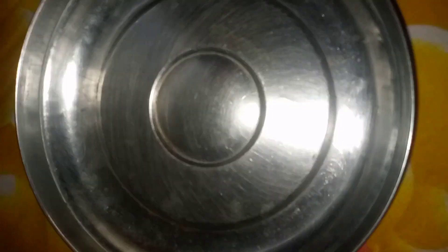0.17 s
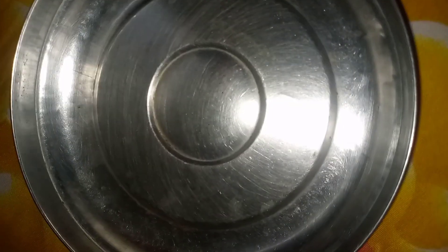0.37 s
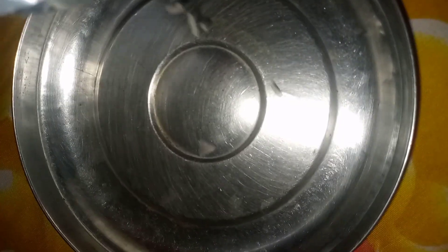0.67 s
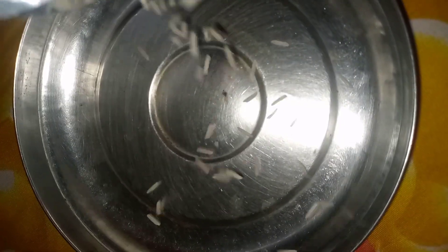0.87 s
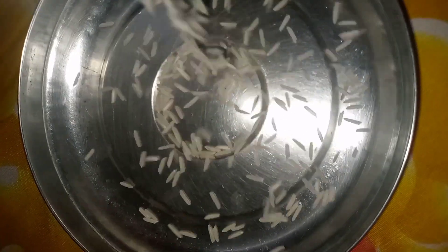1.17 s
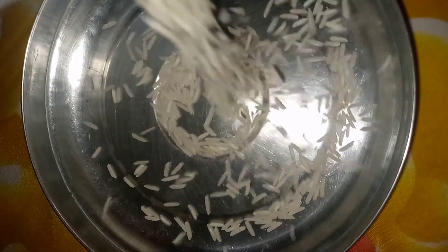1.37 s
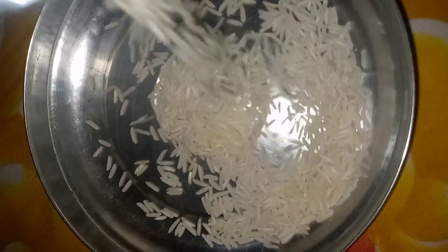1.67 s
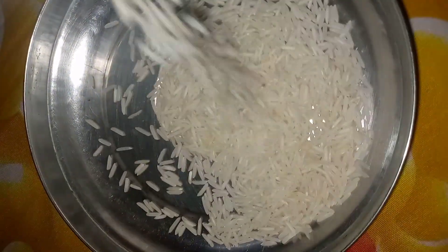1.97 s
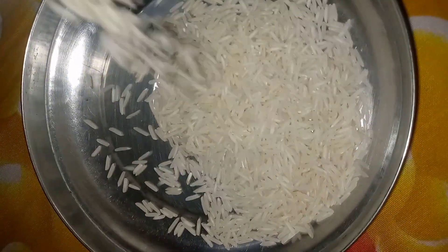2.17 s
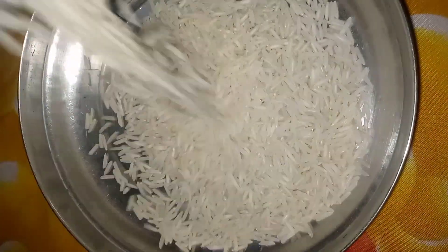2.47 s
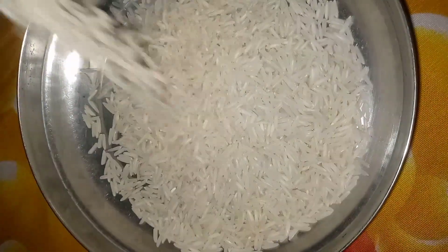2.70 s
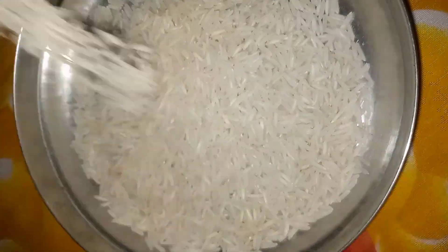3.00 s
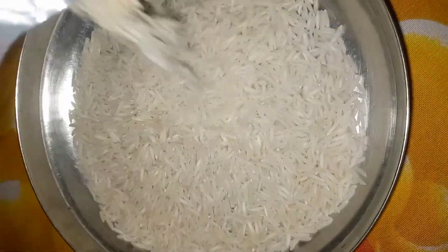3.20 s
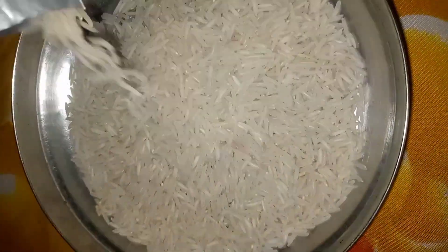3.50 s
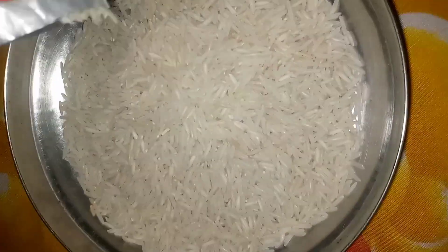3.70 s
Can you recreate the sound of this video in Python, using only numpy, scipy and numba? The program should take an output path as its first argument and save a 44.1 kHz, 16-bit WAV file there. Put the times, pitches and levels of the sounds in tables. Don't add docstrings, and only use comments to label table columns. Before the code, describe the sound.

Dry rice rattles from a scoop into an empty steel bowl, ringing brightly, then growing duller.

```python
import sys
import numpy as np
from scipy import signal
from scipy.fft import rfft, irfft
from scipy.io import wavfile
from scipy.ndimage import uniform_filter1d
from numba import njit

SR = 44100
rng = np.random.default_rng(int(sys.argv[2]) if len(sys.argv) > 2 else 0)


def voltage_ratio(decibels):
    exponent = np.asarray(decibels, float) / 20
    return 10 ** exponent


def generate_wav(signal):
    frames = np.transpose(np.atleast_2d(signal))
    scaled = np.clip(frames, -1, 1) * 32767
    pcm = np.round(scaled).astype(np.int16)
    wavfile.write(sys.argv[1], SR, pcm)


N = 169785
T = np.arange(N) / SR


def unit(x):
    return x / np.sqrt(np.mean(x ** 2))


def cut(x, low_hz):
    return signal.sosfilt(signal.butter(2, low_hz, "high", fs=SR, output="sos"), x)


def colour(x, table):
    spectrum = rfft(x)
    hz, db = np.array(table, float).T
    f = np.arange(len(spectrum)) * SR / N + 1
    flat = np.sqrt(uniform_filter1d(np.abs(spectrum) ** 2, size=3000))
    gain = voltage_ratio(np.interp(np.log(f), np.log(hz), db, right=db[-1]))
    gain = gain * np.minimum(f / hz[0], 1) ** 2
    return unit(irfft(spectrum / flat * gain, N))


def walk(rate_hz):
    hold = int(SR / rate_hz)
    steps = np.repeat(rng.standard_normal(N // hold + 1), hold)[:N]
    return unit(uniform_filter1d(uniform_filter1d(steps, hold), hold))


def puffs(rows):
    out = 0
    for s, db, length in rows:
        rise = np.clip((T - s) / (length / 4 + 0.00032), 0, 1)
        fall = np.exp(-np.maximum(T - s, 0) / max(length, 0.002))
        out = out + voltage_ratio(db) * rise * fall
    return out


def shower(per_s, scatter_db):
    when, luck, sign = rng.random((3, int(per_s * N / SR)))
    size = voltage_ratio(-scatter_db * np.log(1 - 0.985 * luck))
    return (when * N).astype(int), size * np.sign(sign - 0.5)


@njit
def grains(at, size, hz, cycles, count):
    y = np.zeros(count)
    for k in range(len(at)):
        turn = np.exp((2j * np.pi - 6.9 / cycles) * hz[k] / SR)
        swing = size[k] + 0j
        for i in range(at[k], min(count, at[k] + int(cycles * SR / hz[k]))):
            swing *= turn
            y[i] += swing.imag
    return y


def knots(rows, cycles, count):
    s, db, hz = np.repeat(np.array(rows, float), count, axis=0).T
    fellow = np.arange(len(s)) % count > 0
    late, detune = rng.random((2, len(s))) * fellow
    at = ((s + 0.0015 * late) * SR).astype(int)
    size = voltage_ratio(db) * (1 - 0.83 * late)
    hz = hz * (1 + 0.08 * np.sin(2 * np.pi * detune))
    snap = grains(at, size * voltage_ratio(-5), 1.9 * hz, 5.0, N)
    return grains(at, size, hz, 1.0 * cycles, N) + snap


def ring(at, size, modes):
    out = 0
    for hz, width, db in modes:
        for twin_hz in (0, 30 * rng.uniform(-1, 1)):
            spot = voltage_ratio(3.0 * rng.standard_normal(len(at)))
            r = np.exp(-np.pi * width / SR)
            w = 2 * np.pi * (hz + twin_hz) / SR
            push = np.bincount(at, size * spot, N) * voltage_ratio(db) * (1 - r)
            out = out + signal.lfilter([1, 0, -1], [1, -2 * r * np.cos(w), r * r], push)
    power = sum(voltage_ratio(2 * db) * width for _, width, db in modes)
    return out / np.sqrt(len(at) / N * power * 8 * np.pi / SR)


# (frequency [Hz], level [dB per Hz])
ROOM_TONE = [(25, -27), (90, -9), (200, 0), (330, -3), (450, -22), (700, -22), (1500, -12)]
# (time [s], gain [dB])
ROOM_GAIN = [(.1,5),(.3,7),(.9,-4),(1.3,-28),(1.7,-5),(1.9,4.5),(2.4,3.5),(2.8,-1),(3.45,-6),(3.55,0.5),(3.85,-7)]


def room():
    air = colour(rng.standard_normal(N), list(ROOM_TONE) + [(16000, -44)])
    gain_db = np.interp(T, *np.array(ROOM_GAIN).T)
    return air * voltage_ratio(-62 + 3.0 * walk(4.4) + gain_db)


# (time [s], peak [dB])
HAND = [(0.184, -58), (0.296, -51), (0.386, -50), (0.561, -55), (0.699, -57), (1.063, -71), (2.232, -52),
        (2.413, -51), (2.759, -58), (2.827, -56), (3.264, -59), (3.382, -53.5), (3.652, -54.5)]


def hand_rumble():
    hz, width_hz, length_s = 82, 8.4, 0.044
    band = [(hz - width_hz / 2, 0), (hz + width_hz / 2, 0), (250, -40), (2e4, -90)]
    return colour(rng.standard_normal(N), band) * puffs([(s, db, length_s) for s, db in HAND])


# (time [s], peak [dB], pitch [Hz])
THUDS = [(0.169, -45, 196), (0.345, -45.5, 224), (0.539, -40, 203), (0.577, -36.5, 210),
         (0.669, -43.5, 211), (0.719, -44, 194), (1.07, -43, 182), (1.134, -48, 192), (2.049, -42.5, 188),
         (3.084, -54, 290), (2.902, -31.5, 298), (2.944, -35.5, 283), (3.837, -48, 226)]


def thuds():
    rise_s, t60_s = 0.0049, 0.17
    out = 0
    for s, db, hz in THUDS:
        rise = np.clip((T - s) / rise_s, 0, 1)
        decay = voltage_ratio(-60 * np.maximum(T - s, 0) / t60_s)
        out = out + voltage_ratio(db) * np.sin(2 * np.pi * hz * (T - s)) * rise * decay
    return out


# (time [s], peak [dB], pitch [Hz])
KNOCKS = [
    (0.261, -24, 800),
    (0.59, -31, 600),
    (0.634, -19, 750),
    (1.223, -27, 550),
]


def scoop_knocks():
    return knots(KNOCKS, 5.0, count=1)


# (time [s], peak [dB], pitch [Hz])
CLICKS = [(0.1505, -19, 3200), (0.1675, -18, 3680), (0.2159, -29, 3800), (0.2414, -19, 3820),
          (0.2602, -15, 4400), (0.272, -14, 3700), (0.287, -12.5, 3120), (0.329, -13.5, 4320),
          (0.3364, -20, 4140), (0.3536, -35, 4090), (0.3621, -18, 4340), (0.382, -10, 4100),
          (0.4238, -6.5, 2670), (0.5327, -12, 4100), (0.6109, -10.5, 4130), (0.635, -3, 6440),
          (3.175, -17, 6950), (3.4179, -9, 4100), (3.442, -31, 4020)]
# (time [s], peak [dB], pitch [Hz])
LAST = [(3.615, -30, 3800), (3.626, -25, 4500), (3.688, -30, 2400), (3.706, -29, 1620), (3.7105, -31, 3300),
        (3.722, -29, 2200), (3.74, -28, 1700), (3.747, -21, 2900), (3.754, -26, 1700), (3.796, -23, 4700),
        (3.802, -28, 4200), (3.814, -25, 4130), (3.828, -29, 4500), (3.8405, -17, 1740)]


def lone_grains():
    x = cut(knots(CLICKS, 10.0, count=4), 1500) + cut(knots(LAST, 7.0, count=2), 1000)
    return signal.sosfilt(signal.butter(2, 9500, fs=SR, output="sos"), x)


# (frequency [Hz], width [Hz], level [dB])
RIM_MODES = [(6630, 36, 0), (6980, 49, -6), (7270, 62, -3), (7620, 39, -6), (14000, 29, -26),
             (14900, 63, -23)]
# (time [s], peak [dB], length [s])
RIM_SHOWERS = [(2.545, -13, 0.035), (2.8456, -6.5, 0.0054), (2.9655, -15.5, 0.016), (2.9894, -12.5, 0.02),
               (3.019, -12.5, 0.0077), (3.052, -12, 0.01), (3.07, -23, 0.017), (3.125, -8.5, 0.0046),
               (3.141, -7.5, 0.0044), (3.152, -12.5, 0.0093), (3.1785, -14.5, 0.01), (3.49, -28, 0.0053),
               (3.669, -20, 0.0056), (3.71, -27, 0.005)]
# (time [s], peak [dB])
PINGS = [(2.85,-36),(3.18,-42),(3.353,-41),(3.372,-42),(3.427,-37),(3.472,-34),(3.568,-42),(3.577,-40),(3.646,-42)]


def rim():
    at, size = shower(2500, 1.7)
    showers = ring(at, unit(size) * puffs(RIM_SHOWERS)[at], RIM_MODES)
    s, db = np.array(PINGS).T
    pings = grains((s * SR).astype(int), voltage_ratio(db), np.full(len(s), 14900.0), 560.0, N)
    return voltage_ratio(-7) * showers + pings


# (time [s], rice on scoop and rice [dB], rice on bare steel [dB])
FLOW = [(0.05, -43.5, -75), (0.14, -36.5, -80), (0.239, -30.5, -80), (0.45, -34, -80), (0.66, -29.5, -61),
        (0.74, -27, -36), (0.84, -28.5, -38), (0.96, -33.5, -27), (1.45, -37.5, -26), (1.9, -34.5, -32),
        (2.1, -31.5, -36), (2.45, -29, -31.5), (2.75, -31.5, -37.5), (3.12, -34.5, -40),
        (3.451, -28.5, -49.5), (3.55, -39, -48.5), (3.7, -42.5, -46), (3.85, -43.5, -79)]


def flow():
    s, rice_db, steel_db = np.array(FLOW).T
    return np.interp(T, s, rice_db), np.interp(T, s, steel_db)


# (frequency [Hz], level [dB per Hz])
TICK = [(1000,-19.5),(3000,-6),(5800,-5),(7000,3.5),(9000,-3.5),(11500,-8.5),(13500,-5.5),(16000,-19.5)]
# (frequency [Hz], width [Hz], level [dB])
FLOOR_MODES = [(3350, 90, -11), (5280, 35, 3), (6160, 45, 5), (6365, 110, 2), (6990, 90, -1), (7105, 45, 1),
               (7265, 50, -1), (7450, 60, -2), (7625, 60, 2), (7950, 70, 0), (8310, 60, -3), (8690, 55, -4),
               (8980, 45, -4), (9290, 55, -10)]
# (frequency [Hz], width [Hz], level [dB])
WALL_MODES = [(9860, 110, 0), (10330, 60, -2), (10600, 120, -3), (11250, 220, -6), (12500, 160, -5),
              (12830, 90, -2), (13450, 80, -4), (13800, 120, -3), (14280, 200, -2), (14730, 70, -6),
              (15110, 60, -2), (15320, 60, -5), (15710, 70, 3)]
# (time [s], level [dB])
FIRST = [
    (0.696, -24.5),
    (0.713, -38),
    (0.752, -21),
    (0.791, -24),
    (0.842, -15.5),
    (0.865, -28),
    (0.889, -21.5),
]
# (time [s], peak [dB])
HANDFULS = [(1.0122, -13), (1.0491, -16), (1.1304, -25), (1.167, -15), (1.2711, -28), (1.306, -11.5),
            (1.4023, -22), (1.4536, -6.5), (1.4956, -37), (1.5195, -41), (1.5483, -10), (1.66, -19),
            (1.681, -28), (1.7515, -17), (1.7799, -19), (1.84, -16), (1.913, -17), (1.9356, -12),
            (2.0029, -13), (2.0812, -21), (2.197, -23), (2.2578, -37), (2.427, -35), (2.7985, -27)]


def steel():
    at, size = shower(2500, 2)
    force = voltage_ratio(flow()[1] + 0.9 * walk(8.04) + 0.82 * walk(45.35))
    force = force + puffs([(s, db, 0.0073) for s, db in FIRST])
    force = force + puffs([(s, db - 12.5, 0.0075) for s, db in HANDFULS])
    covered_s, fade_s, covered_db, widen, buried_hz = 1.73, 0.062, -2.5, 2.46, 6500
    covered = 1 / (1 + np.exp((covered_s - at / SR) / fade_s))
    bare_push = unit(size) * force[at] * np.sqrt(1 - covered)
    covered_push = unit(size) * force[at] * np.sqrt(covered * voltage_ratio(2 * covered_db))
    out = voltage_ratio(-9.5) * force * colour(np.bincount(at, size, N), TICK)
    for modes, db in ((FLOOR_MODES, 0), (WALL_MODES, -6.5)):
        damped = [(hz, width * widen, level) for hz, width, level in modes if hz > buried_hz]
        out = out + voltage_ratio(db) * (ring(at, bare_push, modes) + ring(at, covered_push, damped))
    return out


# (frequency [Hz], level [dB per Hz])
SCOOP = [(300, -20), (1340, -14), (2000, -8), (3200, -5), (3850, 1), (4700, -3.5), (6400, -5.5),
         (13500, -37)]
# (frequency [Hz], level [dB per Hz])
HEAP = [(300,-14),(600,-15),(1250,-11.5),(2200,-3),(3700,-1.5),(5500,-3.5),(9500,-17),(13500,-31)]
# (time [s], rise over the steady slide [dB], length [s])
SURGES = [(.149,0,0.0033),(.167,1,0.0065),(.199,9.5,0.0043),(.215,6.5,0.01),(.241,5,0.0044),(.257,10,0.011),(.272,-6,.004),
          (.286,-13,0.0027),(.305,-3,0.0027),(.328,1,.002),(.336,-3,0.0022),(.354,0,.004),(.362,14,0.0015),(.382,6,0.0045),
          (.399,3,0.0071),(.449,3,0.007),(.465,5,0.0078),(.478,5,0.01),(.494,5,0.024),(.562,0,0.015),
          (.583,6,0.0054),(.592,5.5,0.0044),(.61,3,0.0051),(.663,3,0.0082),(.699,-5,0.0082),(.727,-3,.01),
          (.756,-8,0.0036),(.777,-5,.006),(.797,0,0.014),(.817,4,0.0092),
          (2.115,-8,0.06),(2.41,-6,.015),(2.48,-8.5,0.043),(3.51,-2,.02),(3.237,2,0.017),
          (3.401,5,.004),(3.428,-14,0.0028),(3.441,-1,0.0093),(3.473,3,0.0063),(3.54,2,0.0037),(3.649,3,0.0023)]


def slide():
    at, size = shower(3000, 1)
    hz = 700 * 20 ** rng.random(len(at))
    x = colour(grains(at, size * np.sqrt(hz), hz, 2.3, N), [(20, 0), (2e4, 0)])
    x = x + voltage_ratio(-5.5) * rng.standard_normal(N)

    at, size = shower(130, 2.0)
    rattle_s = 0.0027
    hits = np.bincount(at, np.abs(size), N)
    rattle = unit(signal.lfilter([1], [1, -np.exp(-1 / (rattle_s * SR))], hits))

    scoop_ends_s, fade_s = 1, 0.054
    on_heap = 1 / (1 + np.exp((scoop_ends_s - T) / fade_s))
    scoop = unit(colour(x, SCOOP) * (1 + voltage_ratio(-12) * rattle)) * (1 - on_heap)

    level_db = flow()[0]
    sparse_db, full_db = -38, -38.5
    lumpy = voltage_ratio(-16 + 1.6 * np.maximum(sparse_db - level_db, 0))
    pile = colour(x, HEAP) * (1 + lumpy * rattle) / (1 + lumpy) * on_heap
    thin = cut(pile, 840)
    pile = thin + (pile - thin) * voltage_ratio(np.minimum(level_db - full_db, 0))

    clumps_db = 0.4 * walk(9.5) + 1 * walk(60)
    return (scoop + pile) * (1 + puffs(SURGES)) * voltage_ratio(clumps_db + level_db)


def scene():
    near = cut(scoop_knocks() + lone_grains() + rim() + steel() + slide(), 190)
    echo_t60_s, echo_db = 0.08, -13
    tail = rng.standard_normal(SR // 2) * voltage_ratio(-60 * T[:SR // 2] / echo_t60_s)
    echo = signal.fftconvolve(near, tail / np.sqrt(np.sum(tail ** 2)))[:N]
    return (room() + hand_rumble() + thuds() + near + voltage_ratio(echo_db) * echo)[None]


def roll_off(x):
    return signal.sosfilt(signal.butter(12, 16840, fs=SR, output="sos"), x)


def record(dry):
    f = np.arange(N // 2 + 1) * SR / N
    mic_hz, mic_width_hz, mic_db = 15240, 770, 14.5
    x = irfft(rfft(dry) * voltage_ratio(mic_db / (1 + ((f - mic_hz) / mic_width_hz) ** 4)), N)
    limit, opens_s, rise_s = 0.45, 0.038, 0.025
    x = limit * np.tanh(x / limit) * np.clip((T - opens_s) / rise_s, 0, 1) ** 2
    top_hz, fall_hz, drop_db = 15735, 140, 85
    x = irfft(rfft(x) * voltage_ratio(-drop_db * np.clip((f - top_hz) / fall_hz, 0, 1)), N)
    return roll_off(x)


dry = scene()
out = record(dry)
generate_wav(out)
```